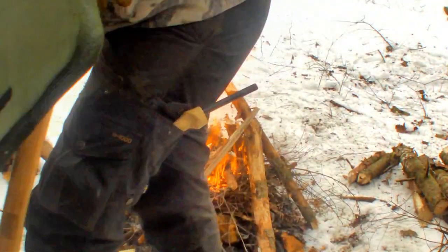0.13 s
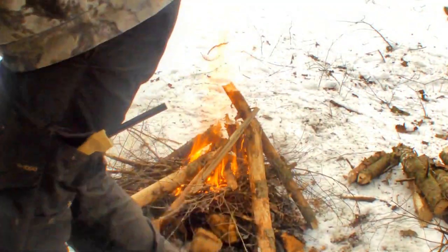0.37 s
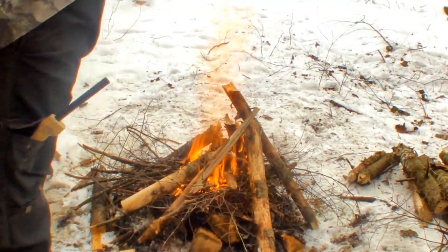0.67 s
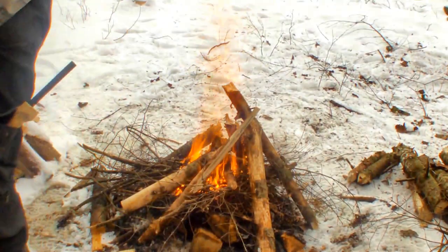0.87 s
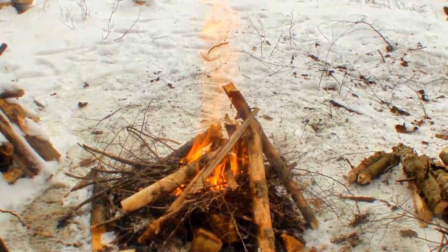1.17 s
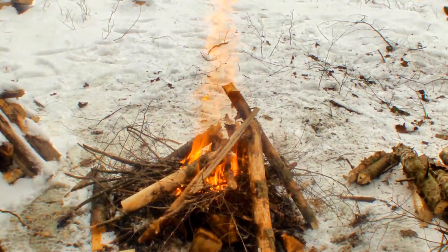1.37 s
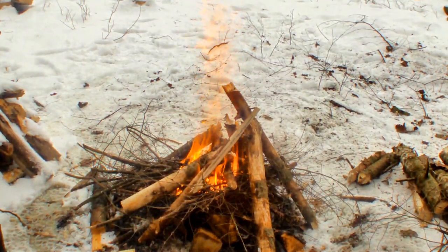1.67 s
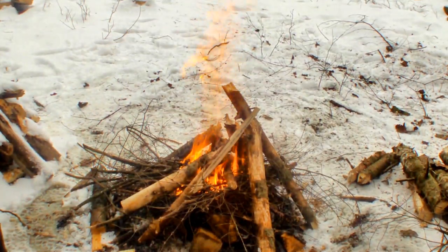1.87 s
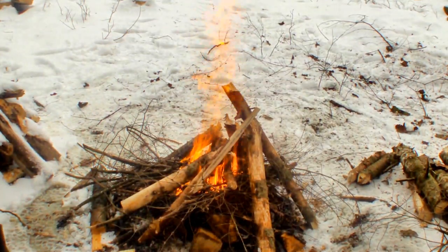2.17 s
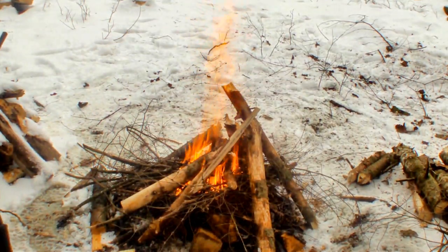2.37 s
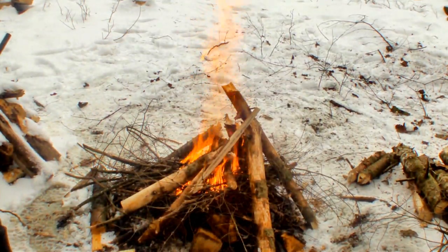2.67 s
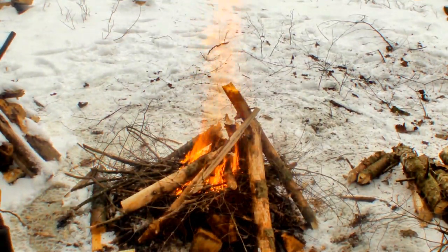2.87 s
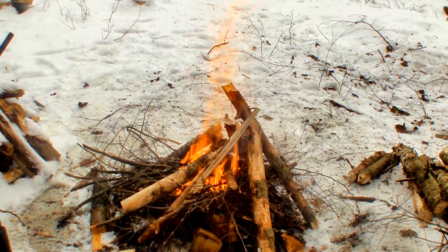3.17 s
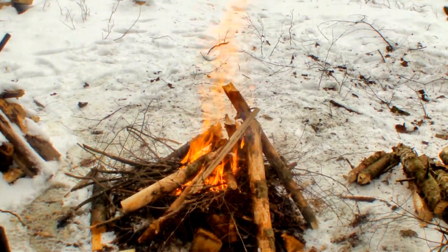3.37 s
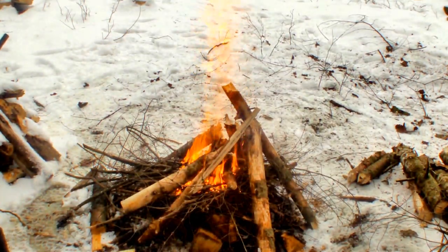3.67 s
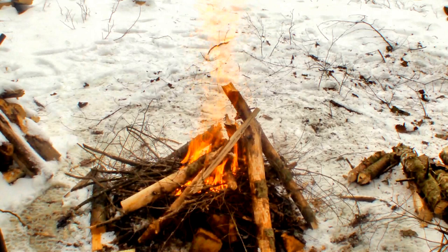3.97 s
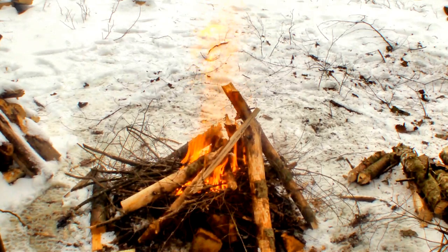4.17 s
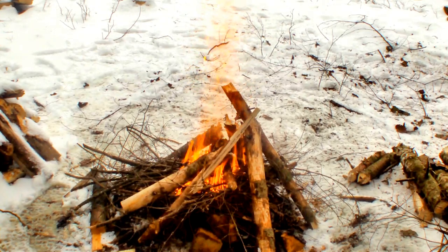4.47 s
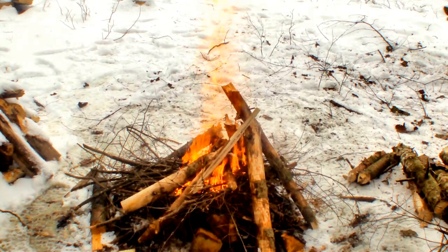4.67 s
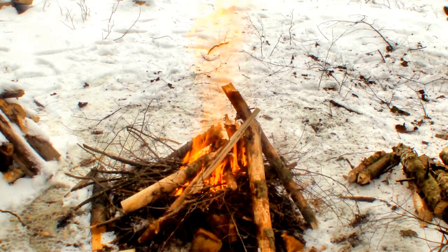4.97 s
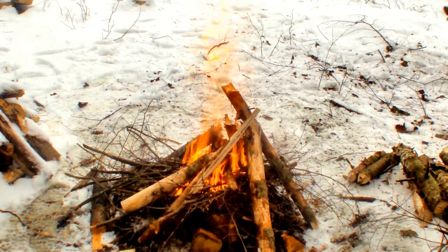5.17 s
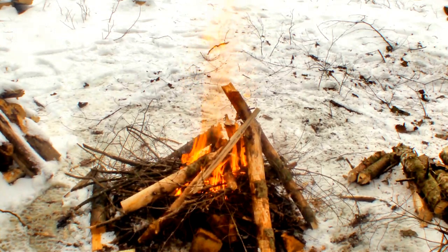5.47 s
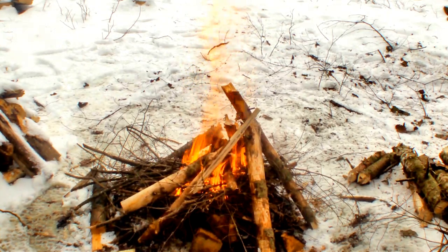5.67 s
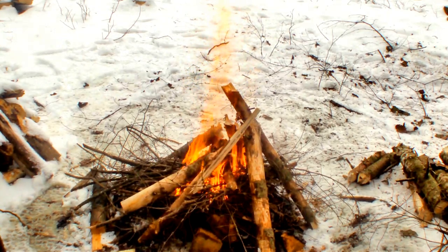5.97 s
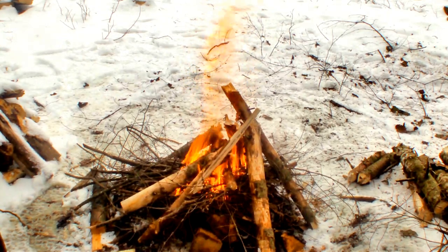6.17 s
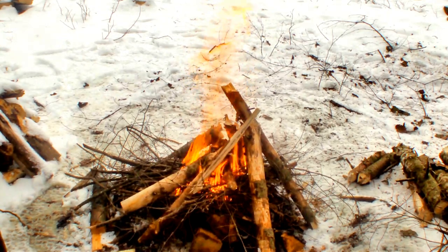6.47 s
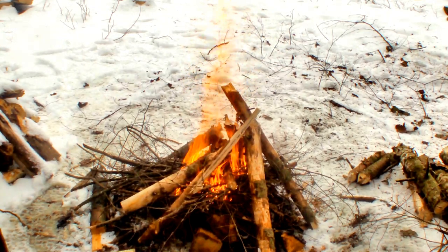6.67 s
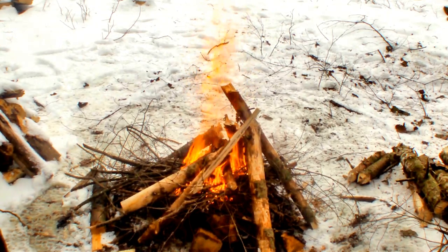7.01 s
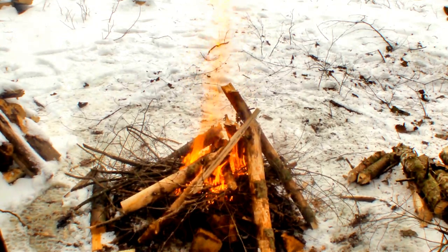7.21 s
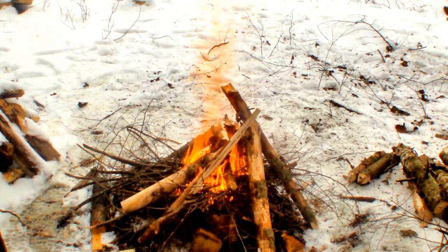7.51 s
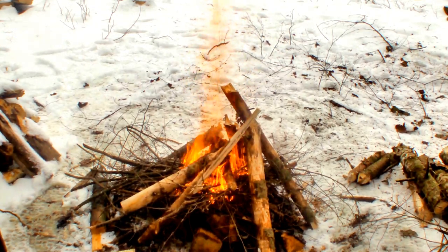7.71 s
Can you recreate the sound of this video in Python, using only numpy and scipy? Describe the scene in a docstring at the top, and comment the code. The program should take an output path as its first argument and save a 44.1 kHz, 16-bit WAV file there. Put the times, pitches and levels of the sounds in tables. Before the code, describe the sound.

A brush fire pops densely and irregularly in a snowy open place. Crisp cracks, some with a short woody scatter, stand far above a faint high fizz and countless ticks. Grainy snow steps and small boot knocks pass at the start; a short shuffle returns near the end of the sixth second. Tiny steam spurts come midway. Close microphone, almost mono, no echo, hard-clamped peaks.

```python
"""Crackling campfire in the snow

A campfire of sticks and brush crackles in the open, heard from close by.
Pockets in the wood burst in sharp snaps: a pulse, tearing fibres and a short tail scattered by the pile.
Snaps set off flurries of weaker ones, over faint ticks, a seething fizz and puffs of steam, all filtered noise.
Someone walks past and later shifts their boots in the snow: grainy noise that follows each step.
A fast limiter flattens the loudest snaps."""
import sys
import numpy as np
from scipy import signal
from scipy.fft import rfft, irfft, next_fast_len
from scipy.io import wavfile
from scipy.ndimage import uniform_filter1d, minimum_filter1d

SR = 44100
rng = np.random.default_rng(int(sys.argv[2]) if len(sys.argv) > 2 else 0)


def int16_out(signal):
    """Quantize to a 16-bit WAV file."""
    q = np.round(np.clip(np.atleast_2d(signal).T, -1, 1) * 32767)
    wavfile.write(sys.argv[1], SR, q.astype(np.int16))


N = 346085
SIZE = 4096  # samples in one burst
BINS = np.fft.rfftfreq(SIZE, 1 / SR)


def gain_of(db):
    """Turns decibels into a factor for the wave's height."""
    return 10 ** (np.asarray(db) / 20)


def evened(x):
    """Scales a sound to an average (rms) strength of 1."""
    return x / np.sqrt(np.mean(x ** 2) + 1e-20)


def read(points, hz):
    """Reads a spectrum joined by straight lines on a log-frequency axis."""
    f, value = np.transpose(points)
    return np.interp(np.log(hz + 1), np.log(f + 1), value)


def bell(hz, centre_hz, octaves):
    """A hump of height 1 around a frequency."""
    distance = np.log2((hz + 1) / centre_hz)
    return np.exp(-.5 * (distance / octaves) ** 2)


def add(mix, s, sound):
    """Adds a sound to the mix at s seconds."""
    first = max(round(s * SR), 0)
    part = mix[first:][:len(sound)]
    part += sound[:len(part)]


def coloured(x, points):
    """Gives a long sound a spectrum, at rms 1."""
    size = next_fast_len(N)
    gain = gain_of(read(points, np.fft.rfftfreq(size, 1 / SR)))
    return evened(irfft(rfft(x, size) * gain, size)[:N])


def drift(count):
    """Slow random wandering: straight lines between random values, count samples apart."""
    knots = np.arange(0, N + count, count)
    return np.interp(np.arange(N), knots, rng.standard_normal(len(knots)))


def struck(drive, colour_db):
    """Colours each row with a filter that never rings before it is hit; each comes out with energy 1."""
    # folding the cepstrum gives the filter its causal (minimum) phase
    cepstrum = irfft(colour_db * np.log(10) / 20)
    cepstrum[:, 1:SIZE // 2] *= 2
    cepstrum[:, SIZE // 2 + 1:] = 0
    y = irfft(rfft(drive, SIZE) * np.exp(rfft(cepstrum)))
    return y / np.linalg.norm(y, axis=1, keepdims=True)


# faint air noise, shape of its spectrum: (frequency [Hz], level per Hz [dB])
AIR_COLOUR = [(20, 10), (120, 1), (400, 7.5), (1500, -15), (5000, -65), (15000, -12.5)]
AIR_DB = -69.5


def air():
    """Faint air noise, unrelated at the two microphone ports."""
    return gain_of(AIR_DB) * np.array([coloured(rng.standard_normal(N), AIR_COLOUR) for _ in range(2)])


# steady seething of the fire, shape of its spectrum: (frequency [Hz], level per Hz [dB])
SEETHE_COLOUR = [(30, -16), (100, -24), (250, -18), (700, -7), (1400, -5.5), (3200, -7), (5000, -6),
                 (6800, 1), (8600, -2.5), (11000, -14.5), (15500, -6)]
SEETHE_DB = -43


def seethe(grain_db=4):
    """Sap boils in a fine fizz that flickers and swells a little."""
    flicker_db = 1.4 * drift(count=500)
    swell_db = 1.2 * drift(count=7000)
    unsteady_db = grain_db * drift(count=18) + flicker_db + swell_db
    grains = rng.standard_normal(N) * gain_of(unsteady_db)
    return gain_of(SEETHE_DB) * coloured(grains, SEETHE_COLOUR)


LAND_S, STOP_S = .009, .032  # rise of a step [s], fade when it stops [s]
SETTLE_DB, SETTLE_S = -14, .11  # settling snow: level [dB] and fade [s]


def tread(start, length, roll_db):
    """Gain of one step: a quick landing, a hold that tilts as the weight rolls on, a stop, a faint settling."""
    t = np.maximum(np.arange(N) / SR - start, 0)
    after = np.maximum(t - length, 0)
    landing = np.minimum(t / LAND_S, 1)
    # the tilt reaches 0 dB when the step stops
    roll = gain_of(roll_db * (np.minimum(t / length, 1) - 1.0))
    settling = gain_of(SETTLE_DB) * np.exp(-after / SETTLE_S)
    return landing * roll * np.maximum(np.exp(-after / STOP_S), settling)


# steps and shuffles in the snow:
# (time [s], length [s], level of the packing crunch [dB], level of the swish of loose crystals [dB])
STEPS_IN_SNOW = [(0, 0.051, -43.5, -35), (0.234, 0.01, -45, -32), (.312, 0.03, -38, -29),
                 (0.351, 0.056, -29, -29.5), (.457, .03, -43, -38), (1.011, 0.081, -29.5, -26.5),
                 (1.141, 0.017, -35.5, -30.5), (1.369, 0.099, -31.5, -37), (1.955, .095, -35, -27.5),
                 (5.498, 0.29, -41, -34), (5.736, 0.064, -33.5, -24), (5.819, 0.055, -32.5, -25.5),
                 (5.953, 0.24, -43.5, -41.5)]
# packing snow, shape of its spectrum: (frequency [Hz], level per Hz [dB])
CRUNCH_COLOUR = [(30, -25), (200, -25), (450, -13.5), (800, -4.5), (1400, -1.5), (2500, -4.5), (4000, -5.5),
                 (8000, -21), (15000, -37)]
# loose crystals, shape of their spectrum: (frequency [Hz], level per Hz [dB])
SWISH_COLOUR = [(30, -36), (1500, -40), (3500, -13), (5000, -1.5), (6500, 3), (8600, -5.5), (11000, -10),
                (15500, -21)]
ROLL_CRUNCH_DB, ROLL_SWISH_DB = 2, -3  # change while the weight rolls on


def boots(grain_db=4, clump_db=2.5):
    """Snow packs in clumps of tiny fractures while loose crystals brush along the boot."""
    crunch = np.max([gain_of(db) * tread(s, length, ROLL_CRUNCH_DB)
                     for s, length, db, _ in STEPS_IN_SNOW], axis=0)
    swish = np.max([gain_of(db) * tread(s, length, ROLL_SWISH_DB)
                    for s, length, _, db in STEPS_IN_SNOW], axis=0)
    out = np.zeros(N)
    for level, colour in ((crunch, CRUNCH_COLOUR), (swish, SWISH_COLOUR)):
        unsteady_db = grain_db * drift(count=14) + clump_db * drift(count=220)
        grains = rng.standard_normal(N) * gain_of(unsteady_db)
        out += level * coloured(grains, colour)
    return out


# colour of a crack: (frequency [Hz], level [dB])
CRACK_COLOUR = [(30, -24), (250, -22.5), (700, -21), (1300, -16), (2300, -11.5), (3500, -10), (5000, -6),
                (6800, 1), (8600, -3), (10500, -12), (12500, -17), (15500, -20.5)]
# colour of the scattered tail against its crack: (frequency [Hz], level [dB])
SCATTER_COLOUR = [(60, -18), (300, -8), (900, 0), (2300, 1.5), (4000, 0.5), (6500, 0.5), (10000, 0),
                  (15000, 4.5)]
# standing resonances of the pile: (frequency [Hz], width [octaves], level [dB])
PILE_RESONANCES = [(1286, 0.027, 3.5), (2282, 0.019, 3)]
TAIL_T60 = 0.065  # time for the tail to fall by 60 dB [s]


def bursts(rows, tear=0.35, tear_s=0.00073, ring_db=6.0, ring_octaves=0.19, spiky=1.67):
    """Each pocket bursts with one pulse and briefly tearing fibres; the pile scatters it into a short tail."""
    s, db, ring_hz, bright_db, tail_db = np.transpose(rows)[:, :, None]
    t = np.arange(SIZE) / SR
    fibres = rng.standard_normal((len(rows), SIZE))
    echoes = rng.standard_normal((len(rows), SIZE))
    # brightness tilts the crack; the low push of the escaping gas follows its size alone
    tilt = np.log2(np.maximum(BINS, 1000) / 5500) * (1 - np.exp(-(BINS / 500) ** 2))
    pile_db = sum(height * bell(BINS, hz, octaves) for hz, octaves, height in PILE_RESONANCES)
    splinter_db = ring_db * bell(BINS, ring_hz, ring_octaves)
    colour_db = read(CRACK_COLOUR, BINS) + pile_db + bright_db * tilt + splinter_db
    crack = struck((t == 0) + tear * fibres * np.exp(-t / tear_s), colour_db)
    # a few sticks reflect strongly, most weakly; the echoes build up as the crack dies
    reflections = np.sign(echoes) * abs(echoes) ** spiky
    build_up = 1 - np.exp(-(t / 0.00075) ** 2)
    scatter = reflections * build_up * 1000 ** (-t / TAIL_T60)
    tail = struck(scatter, colour_db + read(SCATTER_COLOUR, BINS))
    # the level is the crack's average strength if spread over 2 ms
    sounds = gain_of(db) * np.sqrt(.002 * SR) * (crack + gain_of(tail_db) * tail)
    out = np.zeros(N)
    for start, sound in zip(s[:, 0], sounds):
        add(out, start, sound)
    return out


TICK_DB, TICK_SPREAD_DB = -35.5, 4.5


def ticks(tail_db=-11):
    """Small dry bursts: thin twigs go off at random."""
    count = 520  # twigs that go off
    when = rng.random(count) * N / SR
    size, bright, pitch = np.clip(rng.standard_normal((count, 3)), -2, 2).T
    level_db = TICK_DB + TICK_SPREAD_DB * size
    ring_hz = 4600 * 2 ** (.7 * pitch)
    rows = np.c_[when, level_db, ring_hz, 1.2 * bright + .8, np.full(count, tail_db)]
    return bursts(rows, tear=0.26)


# the loud snaps: (time [s], level of the crack [dB], ring of the splinter [Hz],
# brightness [dB per octave], scattered tail against the crack [dB])
LOUD_SNAPS = [(0.123, -20, 5160, -0.5, -5), (0.15, -16, 5670, 0, 1), (0.2664, -17, 8500, 0.5, -8),
              (0.3491, -11, 1190, 1.5, 5.5), (0.364, -9, 7400, 16, -15), (0.5958, -16.5, 1200, 1, -14),
              (0.7152, -22, 1200, 1.5, 3), (0.7225, -7, 2280, 0.5, -8.5), (0.7592, -16.5, 1300, 0.5, -5),
              (0.7732, -11, 1200, 5, -5.5), (0.8984, -12, 1180, 2.5, -4.5), (0.9092, -20, 2110, 1.5, 7),
              (0.9678, -20.5, 3000, 1.5, -5), (1.026, -24, 1610, -3.0, 8.5), (1.0483, -18.5, 9900, -6.5, 3),
              (1.2197, -21.5, 2000, -0.5, -6), (1.303, -16, 8400, -3.5, -10), (1.3154, -7.5, 3440, 1.5, -8),
              (1.3834, -21, 1170, 0.5, 8.5), (1.4673, -10, 1190, 4.5, -11), (1.5251, -5, 9800, 0.5, -6),
              (1.5484, -3.5, 3930, 1, -12), (1.607, -21.5, 4000, -1, -1), (1.6796, -18.5, 2600, 2.5, -8),
              (1.69, -20.5, 2400, 1.0, 2), (1.7344, -22, 6740, -3.5, -23), (1.7867, -22.5, 6800, -1.5, 2),
              (1.8063, -17.5, 10000, -0.5, -2), (1.9278, -23, 1210, 0.5, 4.5), (1.9653, -10, 4730, 1.5, -2),
              (2.0478, -20.5, 1500, -2, 3), (2.0857, -21.5, 1400, 1.5, 2), (2.1081, -19, 3600, 4, -6),
              (2.2131, -11.5, 4260, 2.5, -5.5), (2.263, -14.5, 10200, -1.5, -5),
              (2.283, -16.5, 3800, -1.5, -9), (2.3858, -23.5, 4640, 1.5, -1), (2.4137, -14, 6830, -1.5, -3),
              (2.4308, -11, 3700, -1.5, -5.5), (2.464, -18, 1170, -2.5, 6), (2.4959, -16.5, 9600, 0.5, 2),
              (2.5023, -13, 7600, 9, -10), (2.5128, -23.5, 9900, -1.5, 1), (2.5556, -21.5, 1600, 2, 0),
              (2.6048, -16, 3240, -1, 2.5), (2.729, -11.5, 1590, 2.5, -3.5), (2.752, -19, 2600, 0.5, -1),
              (2.768, -16.5, 2720, 1.5, -6), (2.7808, -13, 2300, 2, -6), (2.7855, -15.5, 4870, 1, -11),
              (2.8316, -16, 1170, 0, -0.5), (2.8521, -17.5, 9500, 0.5, -6), (2.916, -20.5, 4100, 9, -4),
              (2.9354, -14.5, 10000, -2.5, -9), (2.9676, -20, 1500, 7, -13), (2.9767, -22, 1800, -1.0, 3),
              (3.026, -9, 3000, 1, -1), (3.0559, -24, 7200, 9, 2), (3.061, -3, 7700, -1.0, -4),
              (3.069, -8.5, 6160, -1.5, -8), (3.0811, -2, 7400, 0, -9.5), (3.1338, -20.5, 3600, -0.5, -1),
              (3.1657, -18.5, 4000, -1, -6), (3.2128, -20.5, 4700, 0.0, -2), (3.2387, -13, 9000, -0.5, -5),
              (3.268, -15, 3780, -1.5, -6), (3.2951, -19.5, 1220, 0, 4.5), (3.3901, -16.5, 2400, 2.5, -1.5),
              (3.4258, -20.5, 3600, 3, -7), (3.4725, -19, 3740, -3.5, -9), (3.497, -16.5, 1500, 5.5, -11),
              (3.5253, -21.5, 2640, -1, 7.5), (3.5306, -17.5, 3800, 0, -18), (3.5433, -16, 4200, -1, -27),
              (3.5655, -8, 4900, 1.0, -5.5), (3.6234, -15.5, 1300, 0, -15),
              (3.6628, -22.5, 1300, -1.0, 1.5), (3.7771, -14.5, 3950, 0.5, -5),
              (3.7913, -12.5, 1200, 2.5, -7), (3.8498, -14, 2100, 1.5, 1), (3.861, -11, 2200, 0.5, -5),
              (3.9585, -9.5, 2400, -0.5, -3.5), (4.0852, -13, 2080, 0.5, -15), (4.091, -12.5, 8000, 0, -8),
              (4.1222, -14, 10000, -0.5, -4), (4.1637, -18.5, 1200, 2.5, 4), (4.1766, -13.5, 5200, 0, -5),
              (4.1945, -14.5, 6140, 4, -20), (4.2174, -15, 4870, -0.5, -20), (4.2415, -17.5, 8500, 1, -16),
              (4.2747, -26, 1900, 1, 4), (4.2897, -16.5, 9800, -3.5, -21), (4.2933, -11, 8400, 3, -25),
              (4.3159, -12.5, 8650, 1.5, -4.5), (4.3668, -33, 5800, 2, -2), (4.4007, -14, 5160, 1, -6),
              (4.461, -16.5, 6400, -0.5, -13), (4.4843, -22, 2000, 0.5, -5), (4.606, -14.5, 5530, -3, -3.5),
              (4.6155, -8.5, 2300, 0, -7), (4.6407, -15, 1800, 1.5, -3), (4.689, -15.5, 7650, -1.5, -11),
              (4.7093, -23, 2880, 2, 7), (4.7724, -12, 1300, -2.5, -5.5), (4.7855, -16.5, 4600, 4, 0),
              (4.8265, -19.5, 1800, -1.0, -10), (4.8351, -20.5, 2700, 3, -2), (4.8593, -18, 3600, 2, -10),
              (4.8679, -19, 1300, 0.5, -5), (4.9296, -3.5, 8450, 0, -7), (4.9489, -13, 1300, 0.5, -5),
              (4.9706, -19, 2000, 2, -14), (5.0226, -14.5, 3600, -0.5, -2.5), (5.0465, -3, 10000, 1.0, -8),
              (5.066, -16.5, 4700, 0.5, -19), (5.1318, -16.5, 3600, 9, -18), (5.1558, -20, 4700, 0.5, -8),
              (5.2059, -21, 1600, -0.5, -4), (5.2191, -2, 3650, 2.5, -7), (5.2903, -17.5, 3500, 1.5, 0),
              (5.3627, -9, 7200, 0.5, -5.5), (5.4195, -15.5, 3600, -1.5, -5),
              (5.4412, -16, 2700, -0.5, 6.5), (5.4903, -18.5, 9600, -2.5, -17), (5.555, -21, 1200, 2, -11),
              (5.5914, -3, 2350, 3, -1), (5.6512, -9.5, 2440, 0.5, -4.5), (5.6608, -10, 4760, 1.5, -2),
              (5.744, -32, 4900, -5, -6), (5.8984, -3.5, 9300, 0.5, -10), (5.931, -16.5, 1200, -2, -6),
              (5.9986, -16, 2600, 0.5, 2.5), (6.0663, -14, 4670, 2.5, -4.5),
              (6.1241, -24.5, 1800, -10.5, -4), (6.18, -2, 2160, 1, 0), (6.2023, -12.5, 6900, 0, -9),
              (6.2312, -2.5, 9500, -0.5, -9), (6.2441, -13, 2600, 1, -8), (6.3012, -10.5, 5800, -1, -7),
              (6.3304, -7, 1680, 1, -2), (6.357, -2.5, 3080, 3, -8), (6.4014, -14.5, 9900, 0, -1),
              (6.5007, -14, 8600, 0.5, -10), (6.5099, -18, 5530, 2.5, -3), (6.5388, -14.5, 2650, -1, -2),
              (6.5735, -5.5, 2460, -1.5, -5), (6.6669, -13, 3650, 1.5, -2.5),
              (6.6896, -15, 3200, 0.0, -4.5), (6.793, -8.5, 2800, -0.5, 3.5), (6.8193, -13, 2870, 2.5, 2),
              (6.822, -8.5, 2450, 0.5, -4), (6.8578, -14, 2200, 0.5, -4), (6.9229, -16.5, 1200, 0, -1),
              (6.9332, -19.5, 6500, 1.5, -2), (6.9547, -14.5, 5970, 0, -12), (7.0225, -21, 4200, 1, 2.5),
              (7.0554, -18.5, 4970, -0.5, -0.5), (7.141, -21.5, 3150, 1.5, -18),
              (7.168, -22.5, 5200, -1.5, -5), (7.2363, -21.5, 2200, 1.5, -10),
              (7.2472, -20, 1500, -0.5, -4), (7.2878, -18.5, 6140, 0, -4), (7.3058, -20.5, 6400, -2, -22),
              (7.328, -14, 3630, 0.5, -6), (7.3827, -7, 7150, 0.5, -7), (7.4556, -9.5, 1200, 2, -0.5),
              (7.488, -10.5, 8500, 1.5, -11), (7.5057, -14.5, 1200, 2, 2.5), (7.5825, -19.5, 1800, 1, -4),
              (7.619, -7.5, 4530, 2, -12), (7.6572, -18, 6150, 0, -4), (7.6656, -17.5, 9900, -0.5, -13),
              (7.693, -22, 3000, 6, -5), (7.7089, -10.5, 8100, -0.5, -5.5), (7.7404, -3, 3600, -1.0, 1),
              (7.8305, -20.5, 2400, 0.5, 0)]


def snaps():
    """Pockets in the wood burst in loud, sharp snaps."""
    return bursts(LOUD_SNAPS)


FLURRY_SHARE = .5  # share of two weaker neighbours per snap that go off
FLURRY_S = .024  # average random wait [s], on top of a fixed fifth of it
FLURRY_DB, FLURRY_SPREAD_DB, FLURRY_TAIL_DB = -24.5, 3, -8  # level, its spread, tail against the crack


def flurries():
    """A loud snap can start a flurry: weaker fibres nearby give way just after it."""
    s = np.repeat(np.array(LOUD_SNAPS)[:, 0], 2)
    size, bright, pitch, tail = np.clip(rng.standard_normal((len(s), 4)), -2, 2).T
    when = s + FLURRY_S * (.2 + rng.exponential(1, len(s)))
    level_db = FLURRY_DB + FLURRY_SPREAD_DB * size
    ring_hz = 4200 * 2 ** (.8 * pitch)
    rows = np.c_[when, level_db, ring_hz, 2 * bright + .3, FLURRY_TAIL_DB + 3.5 * tail]
    turn = rng.permutation(len(s))
    return bursts(rows[turn < FLURRY_SHARE * len(s)])


def puffs(rows):
    """Bands of noise that swell and fade: short low ones knock, long narrow ones whistle."""
    t = (np.arange(2 * SIZE) - SIZE) / SR
    bins = np.fft.rfftfreq(2 * SIZE, 1 / SR)
    out = np.zeros(N)
    for s, db, hz, octaves, length in rows:
        swell = np.exp(-.5 * (t / length) ** 2)
        band = irfft(rfft(rng.standard_normal(2 * SIZE)) * bell(bins, hz, octaves))
        sound = swell * band
        add(out, s + t[0], gain_of(db) * sound * np.linalg.norm(swell) / np.linalg.norm(sound))
    return out


# knocks of boots on crust and sticks:
# (time of the peak [s], level [dB], centre [Hz], width [octaves], length [s])
BOOT_KNOCKS = [(.352, -41, 110, 0.85, 0.0066), (.429, -16, 1670, 1, 0.0028), (.431, -38, 600, 0.89, 0.0035),
               (1.115, -37, 900, 0.96, 0.0028), (1.133, -30, 800, 0.98, 0.0027),
               (1.592, -30.5, 840, .65, 0.0026), (2.049, -29, 860, 0.93, 0.017),
               (4.142, -35.5, 800, 1, 0.0083), (5.775, -33, 870, 0.16, 0.0068),
               (6.107, -27.5, 1180, 0.93, 0.0013), (6.124, -25.5, 1360, 0.95, 0.0012),
               (6.286, -16.5, 1450, 0.92, 0.0019)]


def knocks():
    """Boots knock on crust and sticks: brief bands of noise."""
    return puffs(BOOT_KNOCKS)


# jets and puffs of steam from the wood, and at 4.04 s a brief broad band of fine crackle: # (time of the peak
# [s], level [dB], centre [Hz], width [octaves], length [s])
STEAM_JETS = [(3.95, -36, 8700, 0.057, 0.0046), (3.985, -38, 5350, .04, 0.015),
              (4.04, -28, 6550, 0.66, 0.016), (4.14, -25, 5900, 0.53, 0.01),
              (4.372, -26, 6000, 0.091, 0.0038), (4.42, -29.5, 5900, 0.36, 0.02),
              (6.576, -40, 90, .9, 0.0035), (6.622, -38.5, 6450, 0.4, 0.018)]


def jets():
    """Steam escapes from the wood in brief bands of noise; one broad band at 4.04 s is a fizz of fine crackle."""
    return puffs(STEAM_JETS)


# side noise against the sound it follows: (frequency [Hz], level [dB])
SIDE_LEVEL = [(60, -7), (250, -9), (1000, -15), (3000, -19), (7000, -25), (13000, -14)]


def side_noise(x):
    """A faint noise that follows the level of the sound band by band, with random phase."""
    hz, _, z = signal.stft(x, SR, nperseg=256)
    phase = np.exp(2j * np.pi * rng.random(z.shape))
    noise = z * gain_of(read(SIDE_LEVEL, hz))[:, None] * phase
    return signal.istft(noise, SR, nperseg=256)[1][:N]


def scene():
    """Fire and boots are alike in both channels; only the side noise and the air differ."""
    fire = seethe() + ticks() + snaps() + flurries() + jets()
    direct = fire + boots() + knocks()
    # the side noise is opposite in the two channels
    return direct + np.array([[1], [-1]]) * side_noise(direct) + air()


NOTCH_HZ, NOTCH_Q = 7920, 22
EDGE_HZ = 15800  # upper band limit


def record(dry):
    """The microphone port cuts a narrow notch, a very fast limiter flattens the loudest snaps, then the band limit."""
    ported = signal.lfilter(*signal.iirnotch(NOTCH_HZ, NOTCH_Q, SR), dry)
    headroom = 1 / np.maximum(abs(ported).max(0), 1)  # one gain for both channels
    limited = ported * uniform_filter1d(minimum_filter1d(headroom, size=7), size=5)
    low_pass = signal.firwin(255, EDGE_HZ, window=("kaiser", 7), fs=SR)
    return signal.oaconvolve(limited, low_pass[None], "same")


dry = scene()
out = record(dry)
int16_out(out)
```